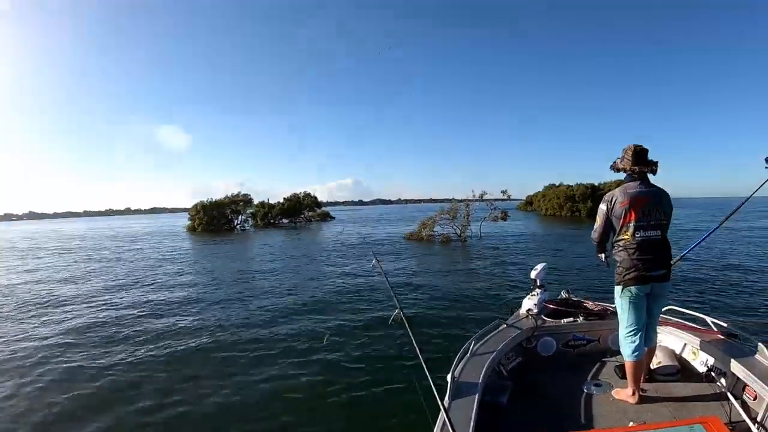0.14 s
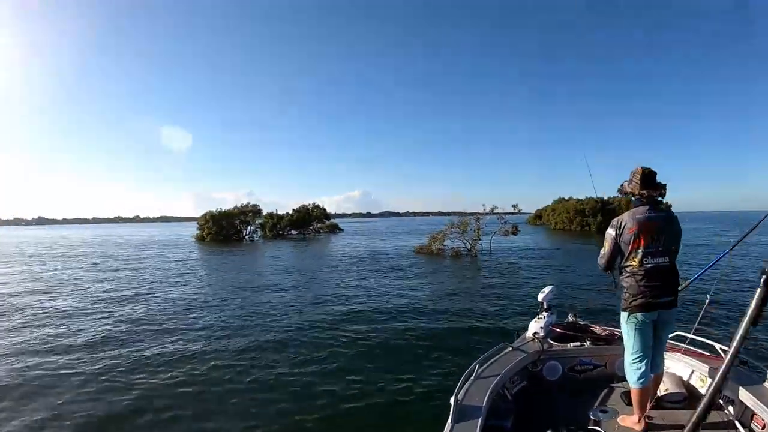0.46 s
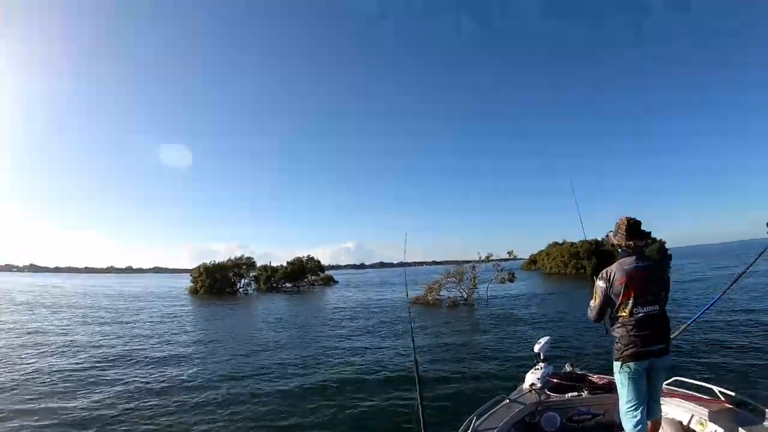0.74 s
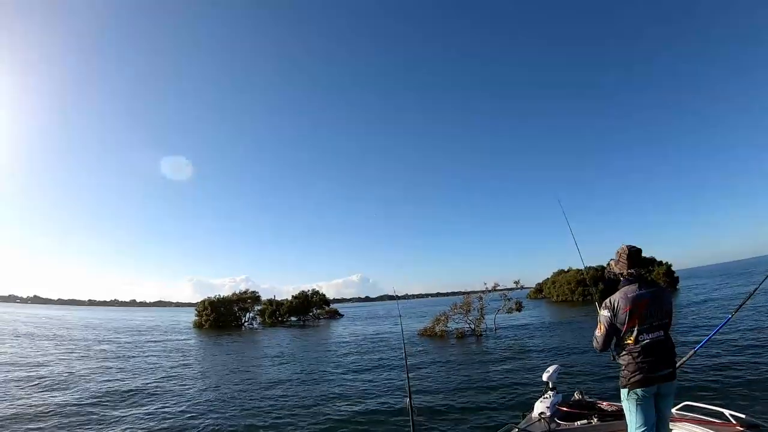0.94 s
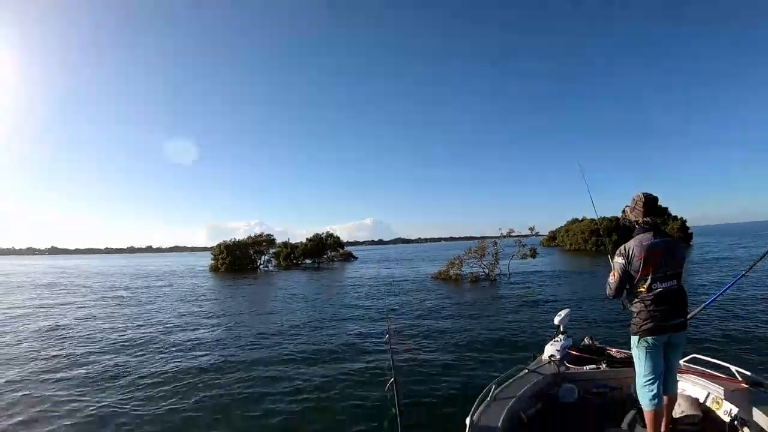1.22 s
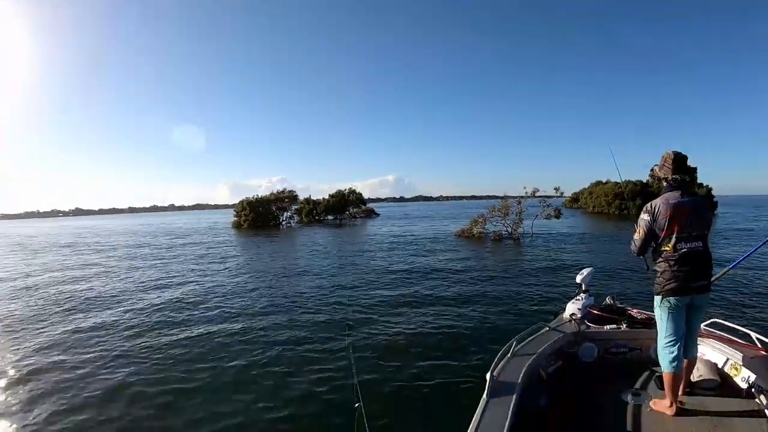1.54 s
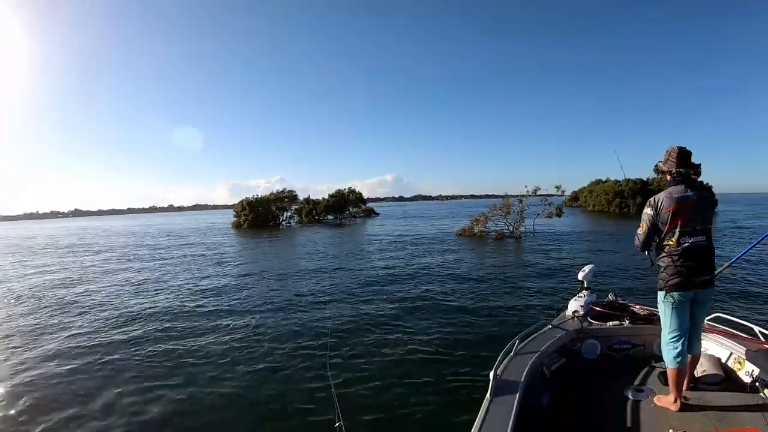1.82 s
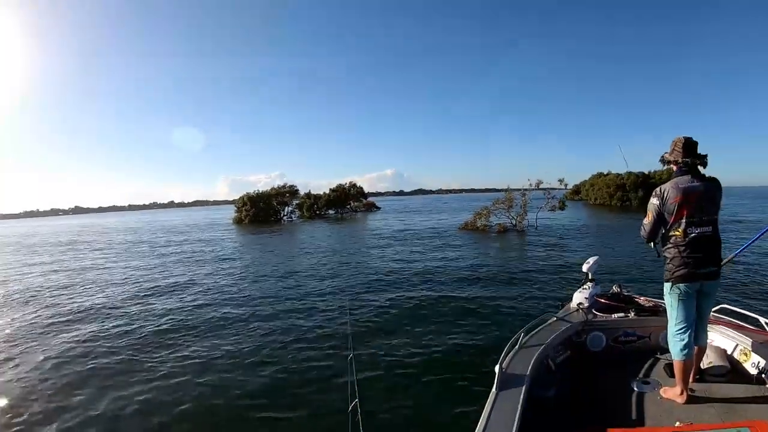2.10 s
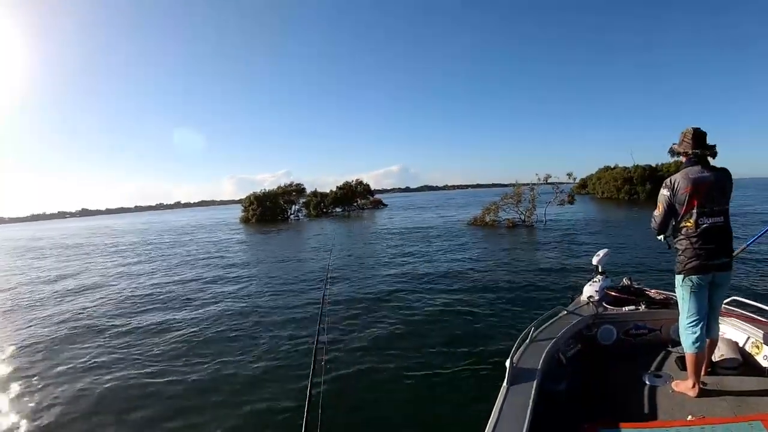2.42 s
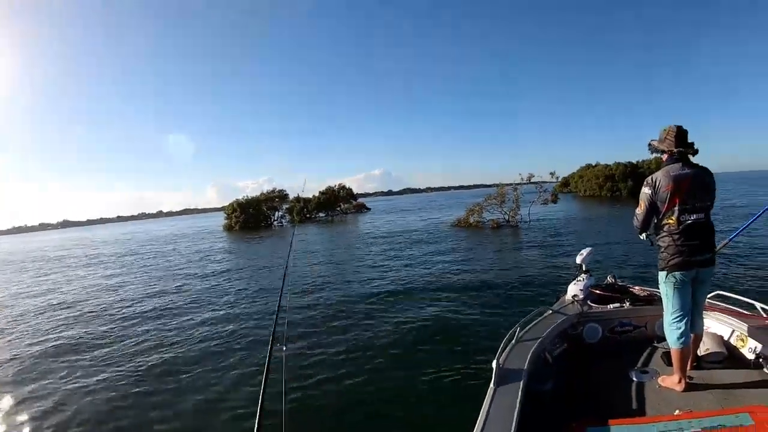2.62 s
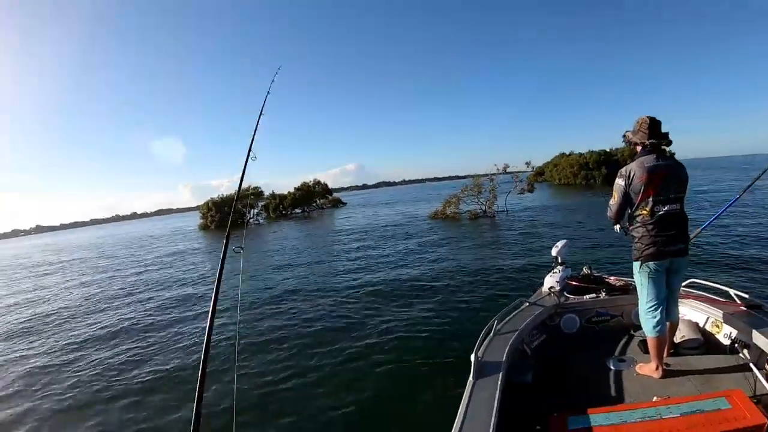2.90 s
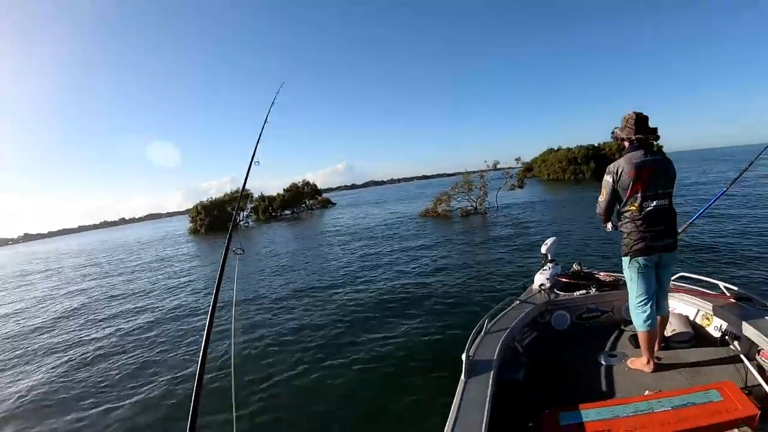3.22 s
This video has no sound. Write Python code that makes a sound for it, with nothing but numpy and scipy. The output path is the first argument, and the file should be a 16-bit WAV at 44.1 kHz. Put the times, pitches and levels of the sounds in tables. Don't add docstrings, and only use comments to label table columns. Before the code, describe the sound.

A small boat's electric motor hums low and steady while water laps the hull and wind gusts.

```python
import sys
import numpy as np
from scipy import signal
from scipy.io import wavfile

SR = 44100
rng = np.random.default_rng(int(sys.argv[2]) if len(sys.argv) > 2 else 0)


def voltage_ratio(decibels):
    exponent = np.asarray(decibels, float) / 20
    return 10 ** exponent


def to_wav(sig):
    pcm = np.clip(np.atleast_2d(sig), -1, 1) * 32767
    pcm = np.round(pcm).astype(np.int16)
    wavfile.write(sys.argv[1], SR, pcm.T)


N = 147735


def in_time(rows):
    s, *columns = np.transpose(rows)
    return [np.interp(np.arange(N) / SR, s, c) for c in columns]


def at_hz(points, hz):
    table_hz, values = np.array(points).T
    return np.interp(np.log(hz), np.log(table_hz), values)


def rms_one(x):
    return x / np.sqrt(np.mean(x ** 2) + 1e-20)


def drift(rate):
    r = np.exp(-80 * np.pi * rate / SR)
    slow = signal.lfilter([1], [1, -2 * r, r * r], rng.standard_normal(N // 40 + 2002))[2000:]
    return np.interp(np.arange(N) / 40, np.arange(len(slow)), rms_one(slow - slow.mean()))


def resonate(x, hz, width_hz):
    r = np.exp(-np.pi * width_hz / SR)
    top = np.array([1, 0, -1]) * (1 - r * r) / 2
    return signal.lfilter(top, [1, -2 * r * np.cos(2 * np.pi * hz / SR), r * r], x)


def filtered(x, order, hz, kind="low"):
    return signal.sosfilt(signal.butter(order, hz, kind, fs=SR, output="sos"), x)


def add(out, s, sound):
    i = max(int(s * SR), 0)
    out[i:i + len(sound)] += sound[:N - i]


def banded(spectrum, low_hz, count, patchy_db, tilt_db=0):
    # (pitch [Hz], likeness [1 = same])
    likeness = [(30, 0.75), (400, 0.82), (1000, 0.096), (2500, 0.89), (8000, 0.083)]
    out, edges = 0, low_hz * 2 ** (np.arange(count + 1) / 2)
    white = rng.standard_normal((2, 2, N))
    for k, (low, high) in enumerate(zip(edges, edges[1:])):
        mid, side = filtered(white[k % 2], 2, [low, high], "band")
        hz = np.sqrt(low * high)
        alike = np.clip(at_hz(likeness, hz), -1, 1)
        gain = voltage_ratio(at_hz(spectrum, hz) + patchy_db * drift(29.0) + tilt_db * np.log2(hz / 1000))
        out = out + gain * (np.sqrt(1 + alike) * mid + np.sqrt(1 - alike) * side * [[1], [-1]])
    return rms_one(out)


def motor():
    # (time [s], level [dB])
    load = [
        (0, -40.5),
        (1.2, -40.5),
        (1.6, -45),
        (1.85, -42),
        (2.2, -42),
        (2.6, -37),
        (3.35, -37),
    ]
    # (multiple of the motor rate [1], level [dB])
    orders = [(.5, -13.5), (1, -2), (2, -16), (2.5, -20.5), (6, -31)]
    motor_hz, wander, flutter_db = 90.03, 0.004, 3
    turns = np.cumsum(motor_hz * (1 + wander * drift(4.3))) / SR
    load_db, = in_time(load)
    tones = 0
    for k, db in orders:
        tone = np.sin(2 * np.pi * (k * turns + rng.random()))
        tones = tones + voltage_ratio(db + flutter_db * drift(4.5)) * tone
    return np.sqrt(2) * voltage_ratio(load_db) * tones * voltage_ratio([[.5], [-.5]])


def rumble():
    # (pitch [Hz], level [dB])
    rumble_colour = [(25, 0), (45, 0.5), (100, -5.5), (500, -37.5)]
    return voltage_ratio(-42.5) * banded(rumble_colour, 18.93, count=10, patchy_db=4.0)


def wash():
    # (time [s], level [dB])
    activity = [(0, -61), (.3, -58), (.6, -59.5), (.8, -54.5), (1.2, -56.5), (1.47, -56), (1.53, -59.5),
                (1.75, -57), (2.05, -53), (2.25, -57), (2.9, -57.5), (3.1, -56), (3.35, -54)]
    # (pitch [Hz], level [dB])
    wash_colour = [(200, -1.5), (450, -15.5), (1000, -15.5), (2000, -27.5), (3300, -27.5), (4500, -33.5),
                   (9000, -51.5), (12000, -86.5)]
    gain_db, brightens = 3, 0.17
    db, = in_time(activity)
    tilt_db = brightens * (db - db.mean())
    return voltage_ratio(db + gain_db) * banded(wash_colour, 161.7, count=13, patchy_db=3.0, tilt_db=tilt_db)


def laps():
    # (time [s], peak
    # level [dB], pitch [Hz], length [s])
    knocks = [(0, -61.5, 2500, 0.99), (0.324, -51, 860, 0.039), (.94, -41, 452, 0.03),
              (1.115, -39, 319, 0.049), (1.25, -49.5, 905, 0.023), (1.387, -39, 221, 0.046),
              (1.449, -49.5, 604, 0.031), (1.565, -48, 870, 0.018), (1.593, -36, 850, 0.0097),
              (1.604, -51.5, 980, 0.08), (1.707, -48.5, 1280, 0.014), (1.916, -36.5, 1100, 0.0071),
              (1.92, -35, 194, 0.052), (2.013, -44.5, 794, 0.032), (2.393, -38, 107.3, 0.071),
              (2.608, -50, 1210, 0.0078), (2.643, -49.5, 240, 0.03), (2.772, -54, 1570, 0.032),
              (3.04, -40, 513, 0.053), (3.034, -43.5, 1340, 0.039), (3.123, -42.5, 281, 0.092),
              (3.159, -52.5, 1000, 0.024), (3.162, -51.5, 1870, 0.032), (3.247, -55, 2030, 0.015)]
    sharpness = 2.6
    out, puffs = np.zeros(N), rng.standard_normal((40, 12000))
    for puff, (s, db, hz, length) in zip(puffs, knocks):
        t = np.arange(len(puff)) / SR
        width_hz = hz / sharpness
        ring = rms_one(resonate(resonate(puff, hz, width_hz), hz, 1.22 * width_hz))
        ring = ring / (0.58 + 0.47 * np.abs(signal.hilbert(ring)))
        strike = np.minimum(t / 0.002, 1) * (1 + 0.56 * np.exp(-t / 0.0049))
        fade = np.exp(-(0.79 * t / length) ** 2)
        add(out, s, voltage_ratio(db - 1.5) * ring * strike * fade)
    return out


def birds():
    # (time [s], length [s], level [dB], start pitch [Hz], end pitch [Hz])
    chirps = [(0, .015, -59, 2700, 2700), (.052, .038, -56, 2300, 2680), (.08, .033, -56, 2680, 1700),
              (.156, .034, -55, 2450, 2100), (.15, .055, -62, 1950, 1720), (.11, .1, -68, 3150, 2950),
              (.265, .035, -67, 3180, 3300), (.298, .024, -56, 1780, 1960), (.315, .027, -54, 1960, 1760),
              (1.26, .03, -63, 2600, 2700), (1.27, .14, -69, 3300, 3350), (1.655, .13, -65, 4050, 4100),
              (1.735, .04, -61, 2950, 3200), (2.348, .025, -67, 3600, 3200), (2.685, .075, -61, 2950, 3230),
              (2.75, .022, -57, 3180, 3350), (2.768, .02, -63, 3500, 3650), (3.155, .04, -56, 2000, 1800),
              (3.245, .035, -60, 2150, 2200), (3.33, .02, -62, 2800, 2800)]
    far_s, blur_hz = .09, 45
    out, blur = np.zeros(N), drift(blur_hz)
    for s, length, db, start_hz, end_hz in chirps:
        u = np.linspace(0, 1, int(length * SR))
        bend = u ** 2 if end_hz < start_hz else 1 - (1 - u) ** 2
        flutter = blur[int(s * SR):][:len(u)] if length > far_s else 1
        arch = np.sin(np.pi * u).clip(0) ** .35
        turns = np.cumsum(start_hz + (end_hz - start_hz) * bend) / SR
        add(out, s, voltage_ratio(db) * flutter * arch * np.sin(2 * np.pi * turns))
    return out


def wind():
    # (time [s], peak level [dB], width of the pressure dip [s])
    gusts = [(0.11, -11.5, 0.0036), (0.198, -15, 0.0037), (0.285, -15.5, 0.003), (0.422, -10.5, 0.0055),
             (0.498, -8, 0.002), (0.539, -16.5, 0.0022), (0.577, -21.5, 0.0045), (0.605, -9, 0.0069),
             (0.641, -28, 0.0079), (0.668, -7, 0.011), (0.693, -7.5, 0.0091), (0.735, -13.5, 0.0014),
             (0.869, -18.5, 0.003), (1.142, -20.5, 0.005), (1.63, -19.5, 0.0068), (2.47, -19.5, 0.0041),
             (2.753, -18.5, 0.01), (3.091, -16, 0.004), (3.269, -19.5, 0.0071)]
    # (pitch [Hz], level [dB])
    gust_colour = [(25, -9.5), (45, 0.5), (90, -9), (180, -20), (300, -41.5), (500, -43.5)]
    breeze_db, stir_db, gust_s = -39, -19, 0.065
    leak_db, rebound_hz = -31.5, 10
    t = np.arange(N) / SR
    force, dips = voltage_ratio(breeze_db), 0
    for s, db, width in gusts:
        force = force + voltage_ratio(db + stir_db) * np.exp(-(2 * (t - s) / gust_s) ** 2)
        dips = dips - voltage_ratio(db) * np.exp(-((t - s) / width) ** 2)
    thumps = filtered(dips, 1, rebound_hz, "high")
    left, right = (banded(gust_colour, 19.5, count=10, patchy_db=-5.0)[0] for _ in range(2))
    return np.array([force * left + thumps, voltage_ratio(leak_db) * force * right])


def ticks():
    # (time [s], peak level [dB], pitch [Hz], length [s])
    snaps = [(.24, -50.5, 5500, 0.0022), (0.607, -54, 5000, 0.0028), (.727, -37, 7500, .002),
             (0.731, -26.5, 4900, .003), (1.608, -49, 5800, 0.002), (1.624, -46, 5500, 0.0027),
             (1.924, -48, 3000, 0.0026), (1.944, -34.5, 2800, 0.0039), (1.963, -48, 5500, 0.0054),
             (1.965, -40, 2700, 0.0026), (2.087, -63, 6500, 0.0018), (2.258, -48.5, 1700, 0.0046),
             (2.26, -55, 4000, 0.0036), (2.287, -64.5, 6100, 0.0037), (2.381, -52, 4300, 0.016),
             (2.374, -64, 7000, 0.0039), (2.42, -49, 3400, .004), (2.431, -59.5, 7500, 0.012),
             (2.441, -53.5, 3000, 0.016), (2.452, -50.5, 2800, 0.014), (2.513, -48, 2800, 0.0024),
             (2.515, -58, 6000, 0.002), (2.583, -47, 2000, 0.01), (2.598, -60.5, 6500, 0.0027),
             (2.659, -64, 6000, 0.0025), (2.662, -51, 2300, .003), (2.707, -64, 6200, 0.0033),
             (2.83, -53, 3000, 0.0038), (3.006, -53, 3400, .004), (3.18, -53.5, 4800, 0.012),
             (3.225, -55.5, 4200, 0.0034), (3.237, -58, 4100, .006), (3.277, -54, 6900, 0.007),
             (3.293, -51.5, 5600, 0.0036)]
    sharpness = 4
    out, puffs, t = np.zeros(N), rng.standard_normal((50, 2000)), np.arange(2000) / SR
    for puff, (s, db, hz, length) in zip(puffs, snaps):
        burst = puff * np.minimum(3 * t / length, 1) * np.exp(-(t / length) ** 2)
        snap = resonate(resonate(burst, hz, hz / sharpness), hz, 2 * hz / sharpness)
        add(out, s, voltage_ratio(db) * snap / np.abs(snap).max())
    return out


def rustles():
    # (time [s], length [s], level
    # [dB], colour [Hz], grain rate [1/s])
    moves = [(0.298, .16, -61.5, 2600, 11000), (0.365, 0.24, -66, 7000, 14000),
             (0.642, 0.14, -43.5, 2430, 6100), (0.724, 0.024, -37.5, 2400, 4900),
             (.74, 0.024, -31.5, 2800, 5100), (0.741, 0.88, -63, 9400, 14000),
             (0.775, 0.2, -53.5, 1560, 4200), (1.109, 0.046, -61, 2420, 3600),
             (1.817, 0.11, -58.5, 3400, 2900), (1.912, 0.073, -47.5, 2860, 3100),
             (1.97, .056, -53, 2330, 2600), (2.03, 0.13, -59, 1190, 3900),
             (2.986, 0.058, -65.5, 3250, 5800), (3.021, 0.047, -48.5, 1590, 4300),
             (3.137, 0.039, -58.5, 2010, 4100)]
    spread_db, cut_hz = 3, 6930
    out, size = np.zeros(N), 66000
    draws, sizes = rng.random((20, size)), rng.exponential(1, (20, size))
    t, clumps = np.arange(size) / SR, voltage_ratio(1.4 * drift(70))
    for draw, big, (s, length, db, hz, rate) in zip(draws, sizes, moves):
        sign = np.sign(np.sin(1e6 * draw))
        grains = (draw < rate / SR) * voltage_ratio(spread_db * np.minimum(big, 4)) * sign
        hiss = (big - 1) * rate / 31000.0
        body = resonate(grains + hiss, hz, 0.62 * hz)
        body = body + 0.21 * (hz / 2500) ** 2 * resonate(grains, 12000.0, 9600.0)
        for k in (.58, .8, .87, 1.16, 1.62, 1.9):
            body = body + 0.31 * resonate(grains, min(hz * k, 12000), 220.0)
        swell = np.minimum(t / (0.21 * length), 1)
        fade = np.exp(-(t / length) ** 3) + 0.066 * np.exp(-t / 0.11)
        add(out, s, voltage_ratio(db) * rms_one(body) * swell * fade)
    return filtered(out * clumps, 2, cut_hz)


def swish():
    # (time [s], pitch [Hz], level [dB])
    whip = [
        (.38, 10170, -81),
        (.47, 9800, -73),
        (.52, 8220, -64),
        (.56, 7020, -67.5),
        (.6, 6300, -72.5),
        (.64, 6960, -59),
        (.67, 8640, -57.5),
        (.72, 7900, -61),
        (.78, 8000, -73),
    ]
    width_hz, pan_db = 3030, 4
    t = np.arange(N)
    hz, db = in_time(whip)
    low = filtered(rng.standard_normal((2, 2, N)), 3, width_hz / 2)
    phase = 2 * np.pi * np.cumsum(hz) / SR
    band = rms_one(low[0] * np.cos(phase) + low[1] * np.sin(phase))
    moving = (t < whip[-1][0] * SR) * (t > whip[0][0] * SR)
    return voltage_ratio(db) * moving * (band + .5 * band[0]) * voltage_ratio([[pan_db / 2], [-pan_db / 2]])


def creak():
    # (time [s], peak level [dB])
    slips = [
        (1.792, -49.5),
        (1.811, -49),
        (1.822, -52),
        (1.838, -40),
        (1.846, -45),
        (1.859, -45),
        (1.869, -47),
        (1.883, -40),
        (1.894, -49),
        (1.906, -47),
    ]
    # (pitch [Hz], level [dB], time to fade by 60 dB [s])
    modes = [(1050, 0, .016), (1800, -6, .012), (5700, -14, .008)]
    out, t, chance = np.zeros(N), np.arange(2000) / SR, rng.standard_normal((20, 3))
    for row, (s, db) in zip(chance, slips):
        for c, (hz, mode_db, t60) in zip(row, modes):
            tone = np.sin(2 * np.pi * hz * (1 + .04 * c) * t)
            add(out, s, voltage_ratio(db + mode_db + 2 * c - 60 * t / t60) * tone)
    return out


def ports(x):
    late = np.r_[0, x[:-1]]
    shadow = 0.65 * resonate(x, 2050, 2200)
    facing = 0.3 * resonate(late, 5500, 3500.0)
    left = late - shadow + facing
    treble = 0.24 * resonate(np.r_[np.zeros(9), x[:-9]], 8500., 5400.0)
    return np.array([left + treble, x - treble])


def scene():
    near = ports(laps() + birds() + ticks() + rustles() + creak())
    return motor() + rumble() + wash() + wind() + near + swish()


def band_limit(x):
    return signal.sosfilt(signal.butter(12, 13740, fs=SR, output="sos"), x)


def record(dry):
    # (time [s], side gain [dB])
    width = [
        (0, 3),
        (.9, 1),
        (1.3, -4.5),
        (1.6, -18.5),
        (2.0, -27),
        (2.1, -71),
        (2.66, -47),
        (2.75, -8),
        (3.0, 1),
    ]
    dry = filtered(dry, 2, 18, "high")
    dry = voltage_ratio(-13.5) * dry + filtered(dry, 12, 10300)
    side_db, = in_time(width)
    mid = (dry[0] + dry[1]) / 2
    side = (dry[0] - dry[1]) / 2 * voltage_ratio(side_db)
    return band_limit(np.array([mid + side, mid - side]))


dry = scene()
out = record(dry)
to_wav(out)
```